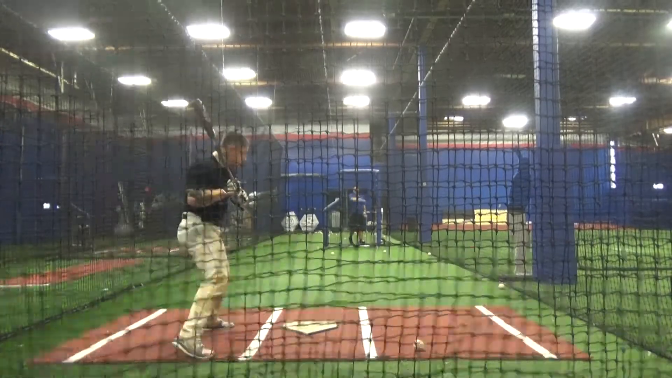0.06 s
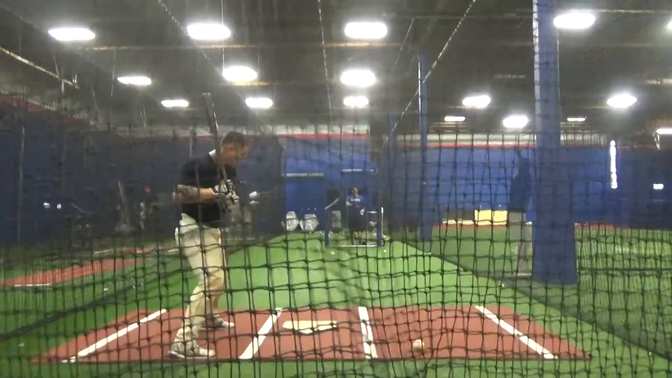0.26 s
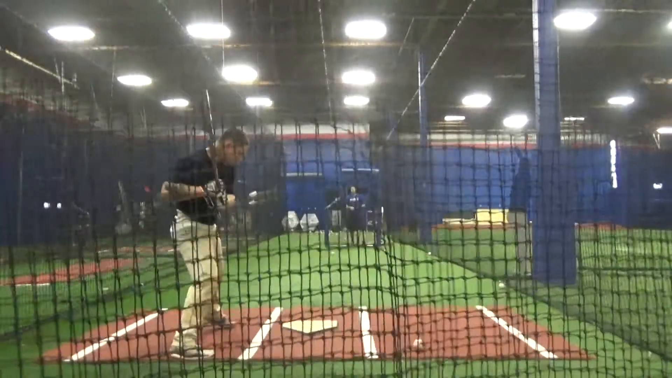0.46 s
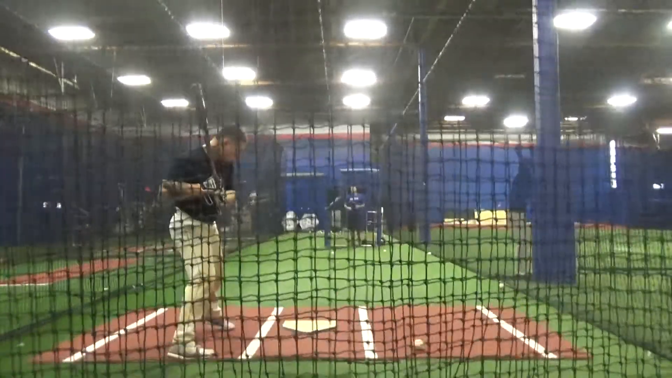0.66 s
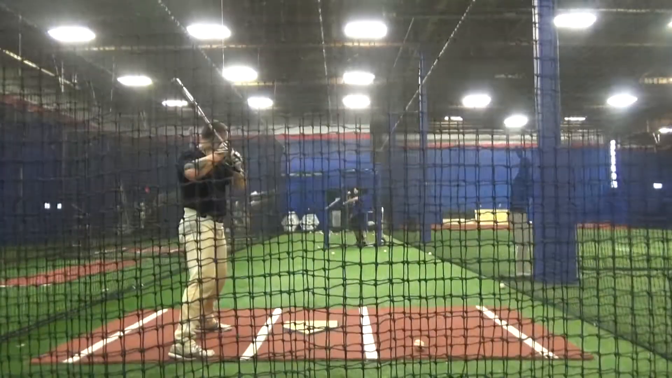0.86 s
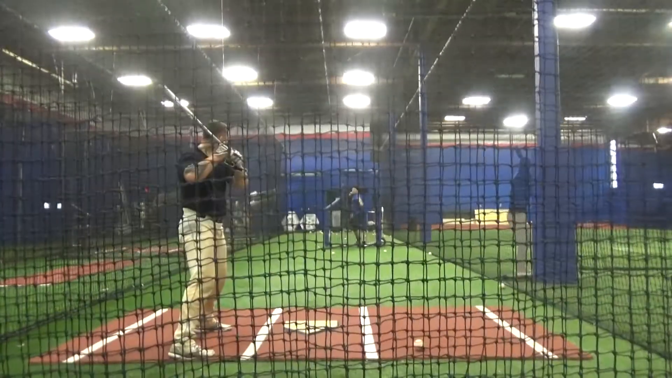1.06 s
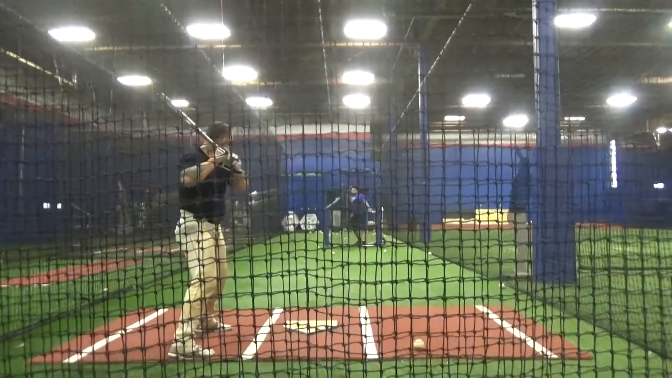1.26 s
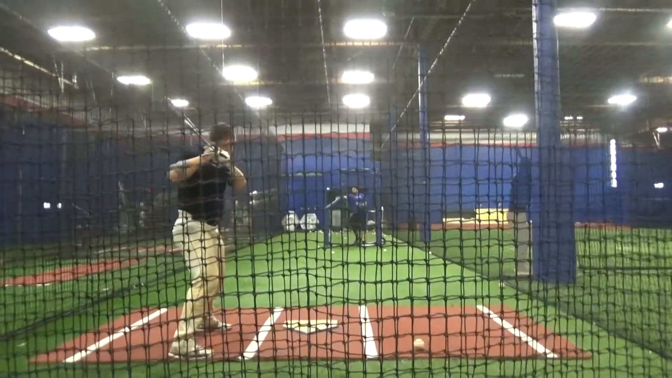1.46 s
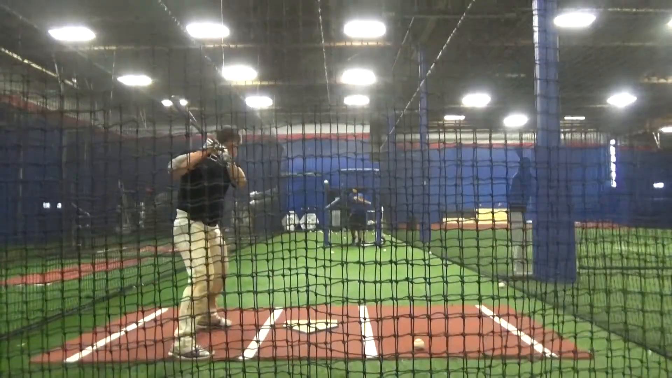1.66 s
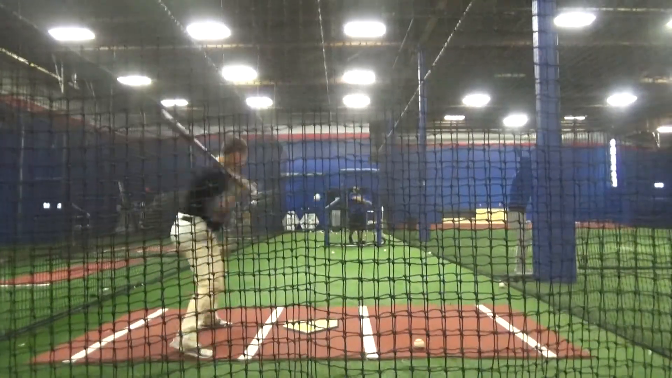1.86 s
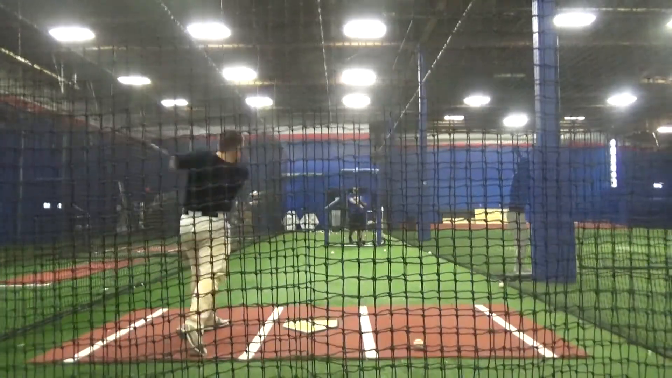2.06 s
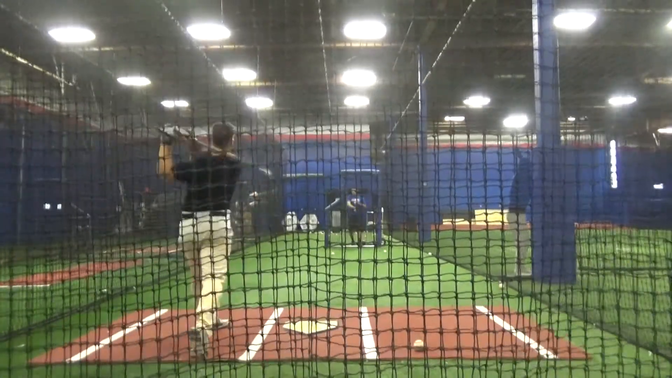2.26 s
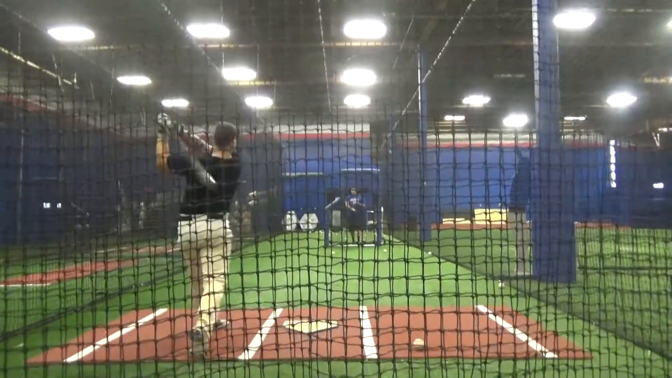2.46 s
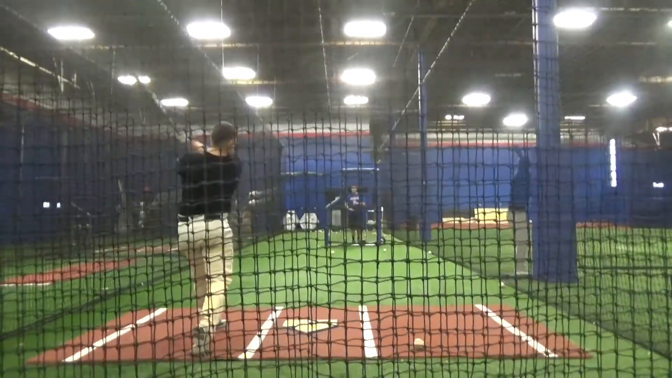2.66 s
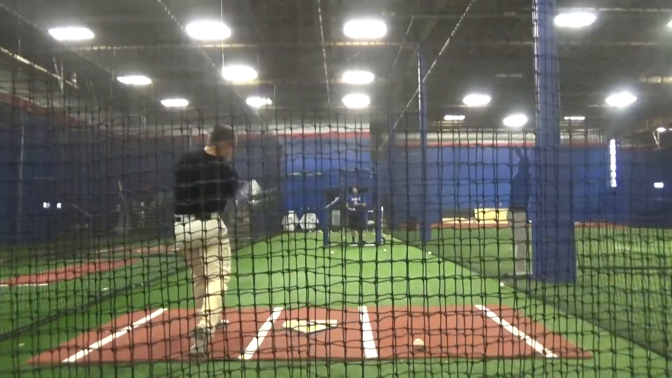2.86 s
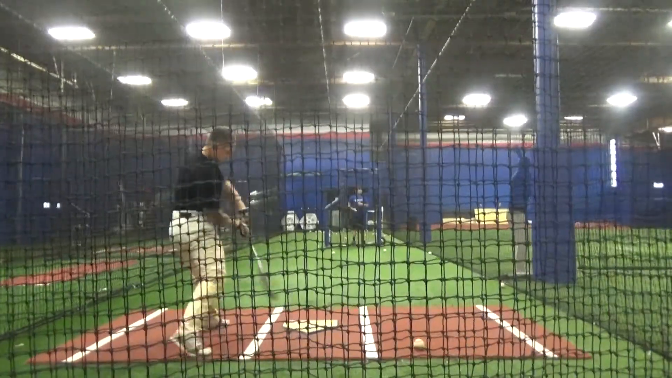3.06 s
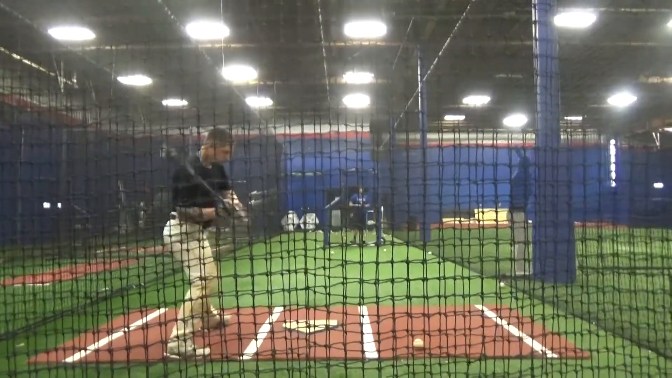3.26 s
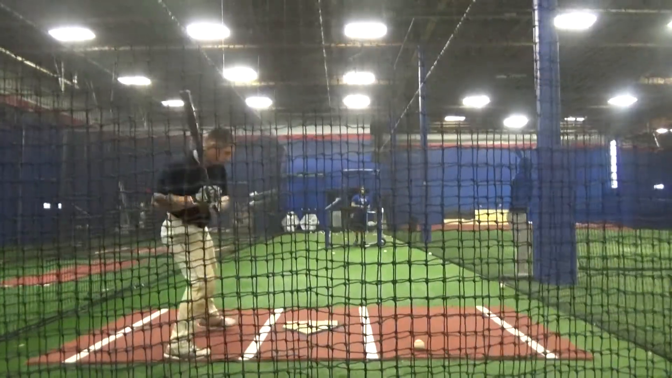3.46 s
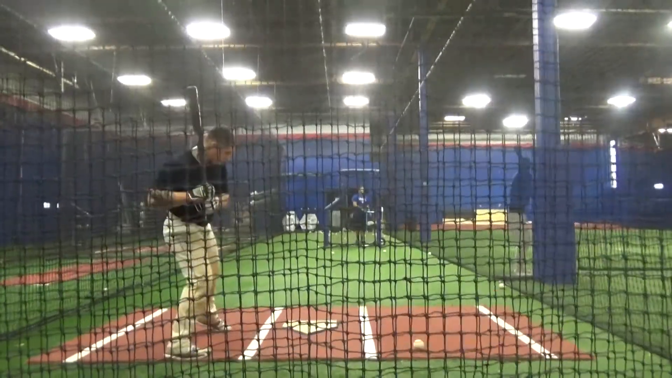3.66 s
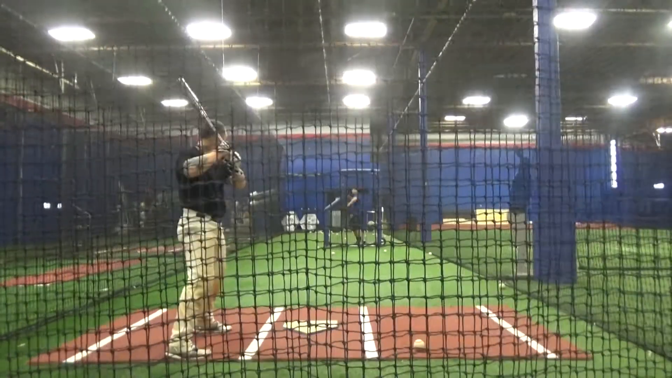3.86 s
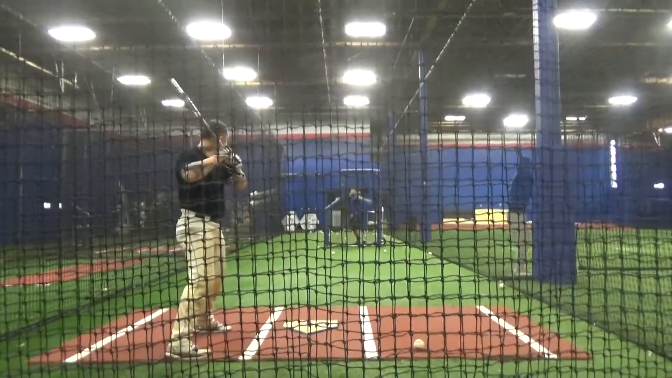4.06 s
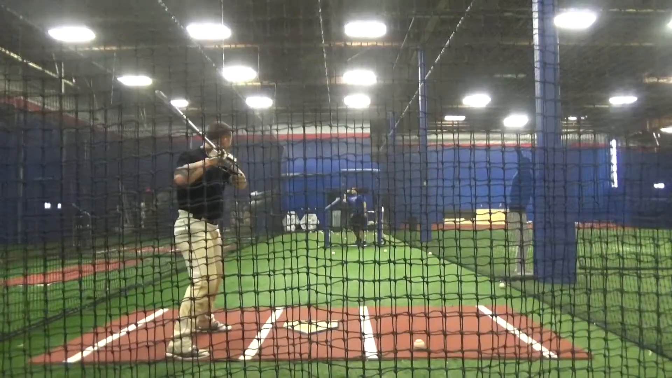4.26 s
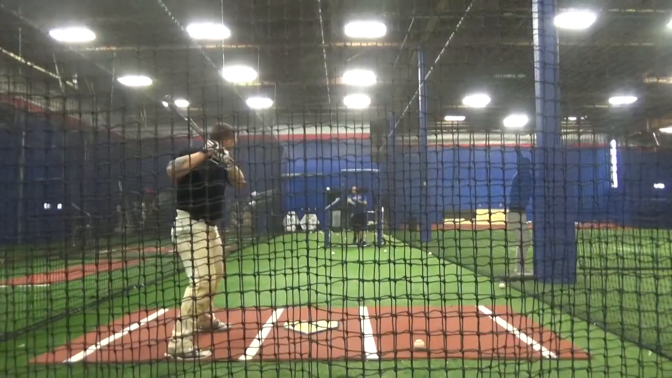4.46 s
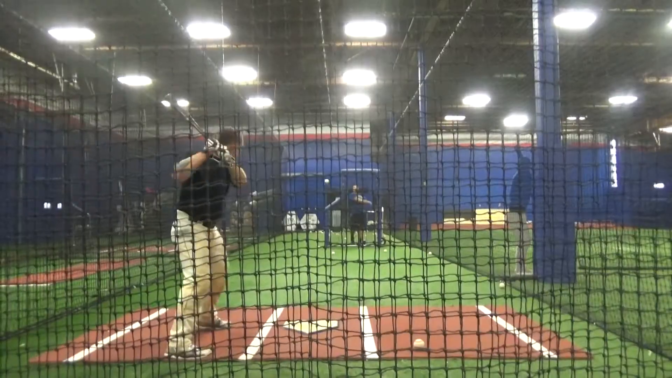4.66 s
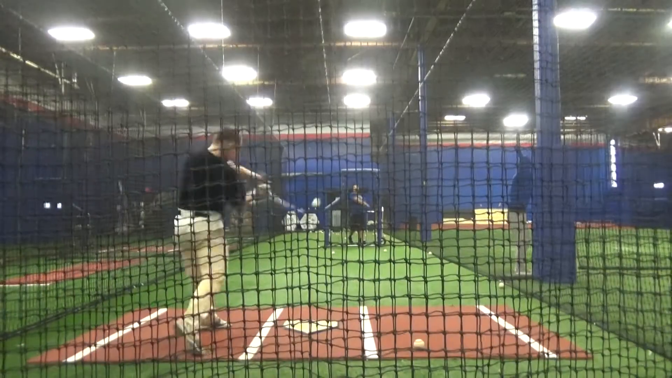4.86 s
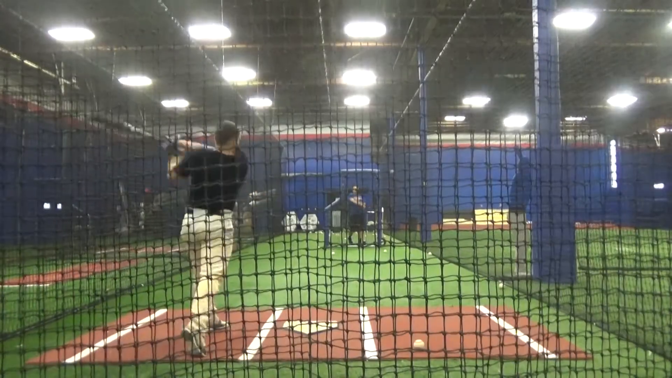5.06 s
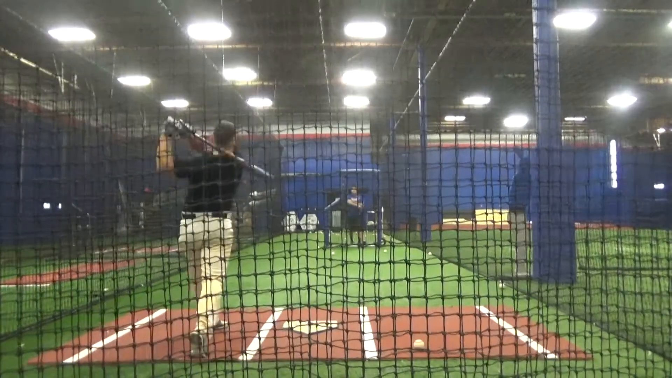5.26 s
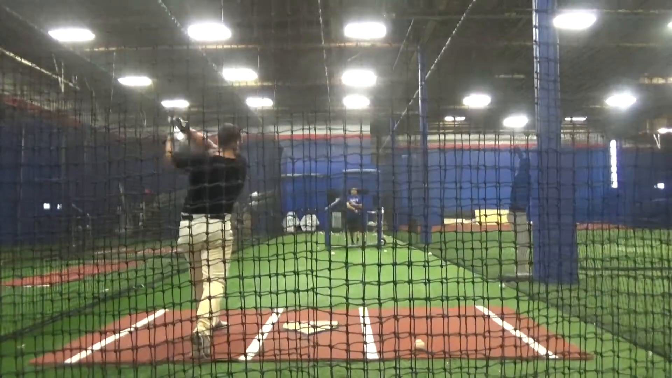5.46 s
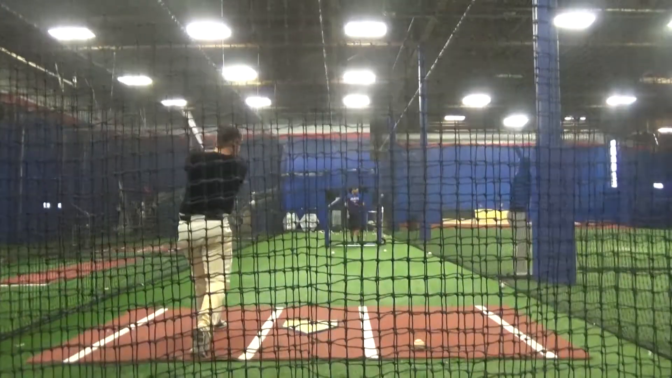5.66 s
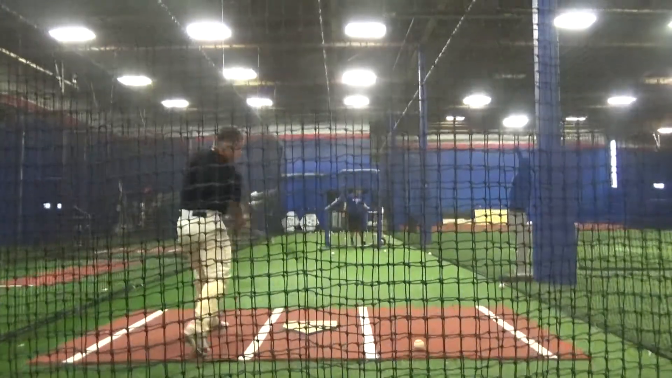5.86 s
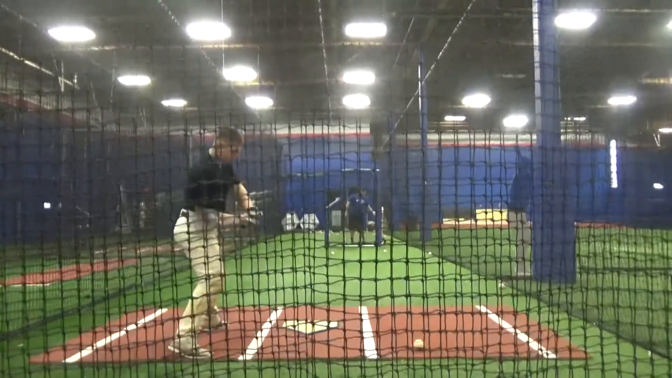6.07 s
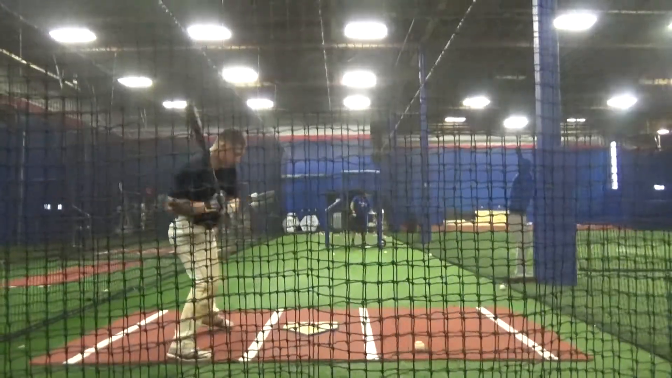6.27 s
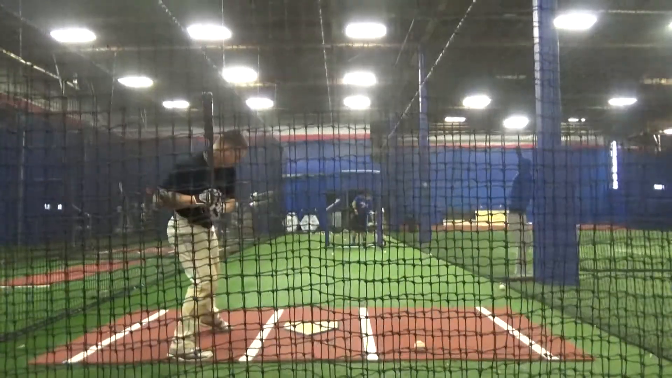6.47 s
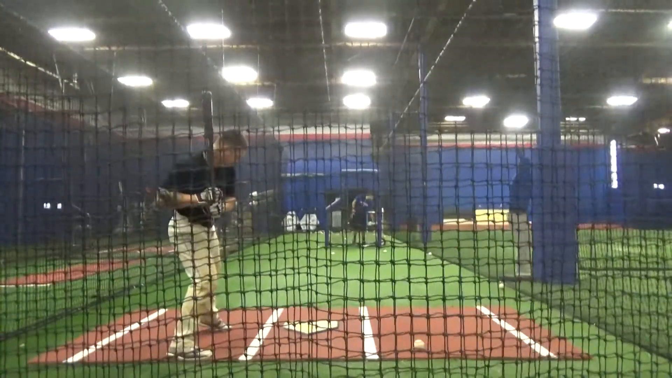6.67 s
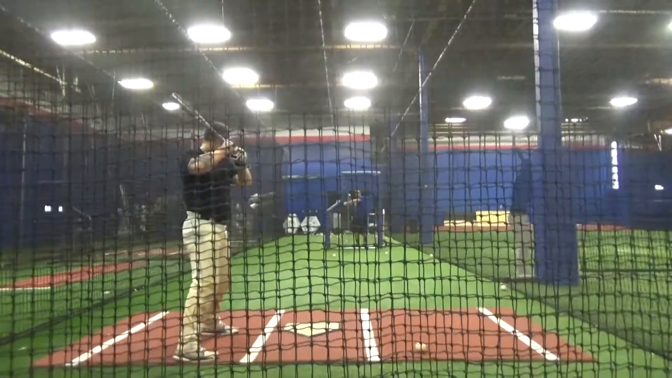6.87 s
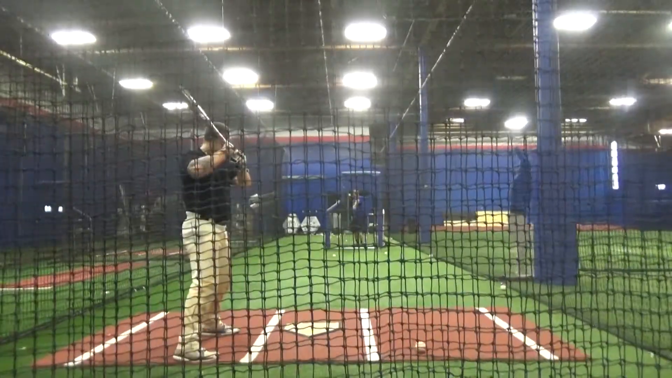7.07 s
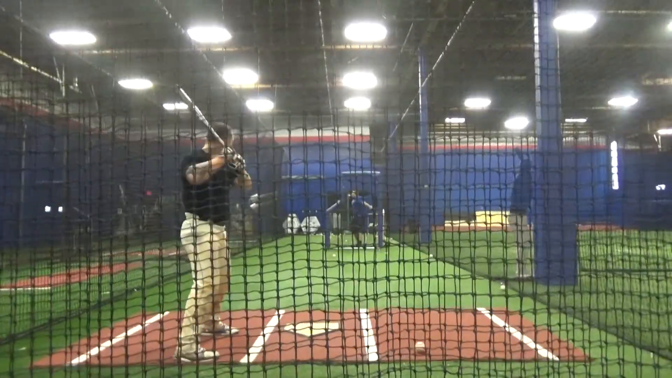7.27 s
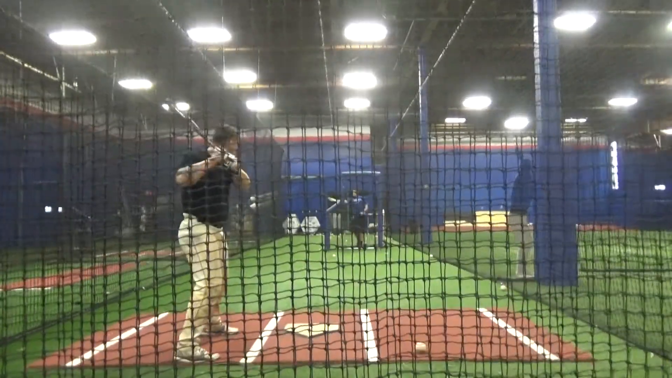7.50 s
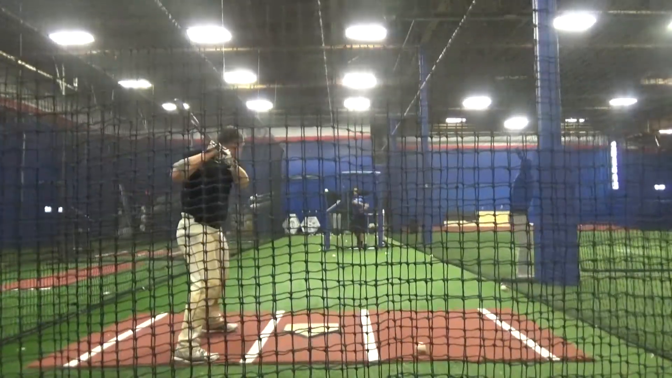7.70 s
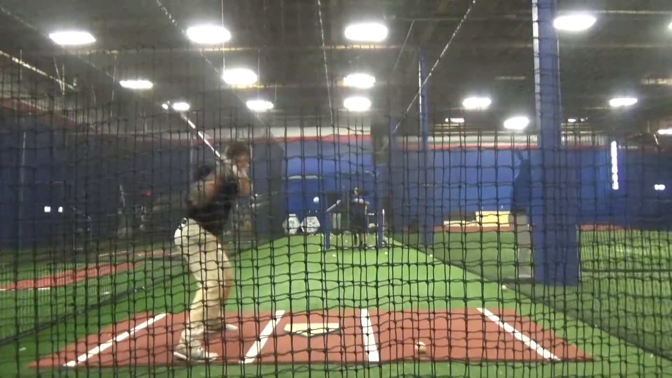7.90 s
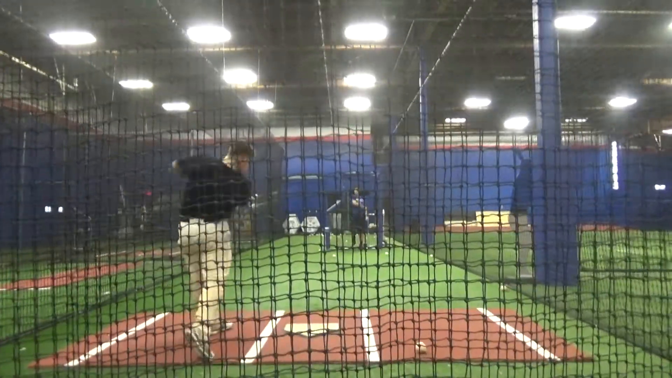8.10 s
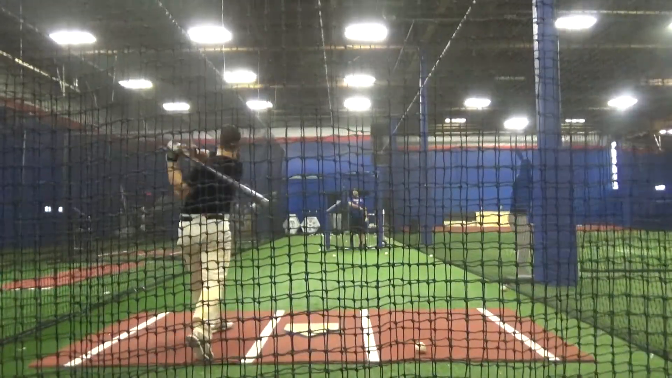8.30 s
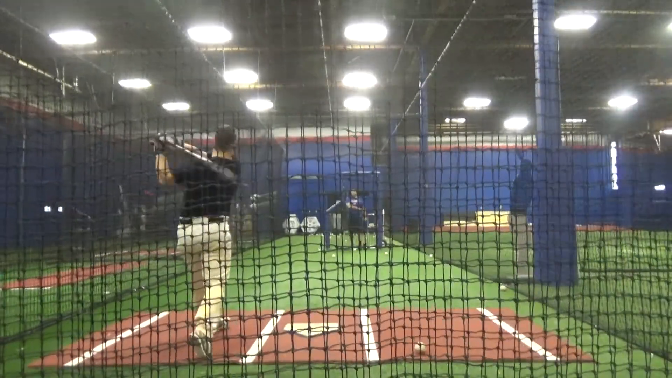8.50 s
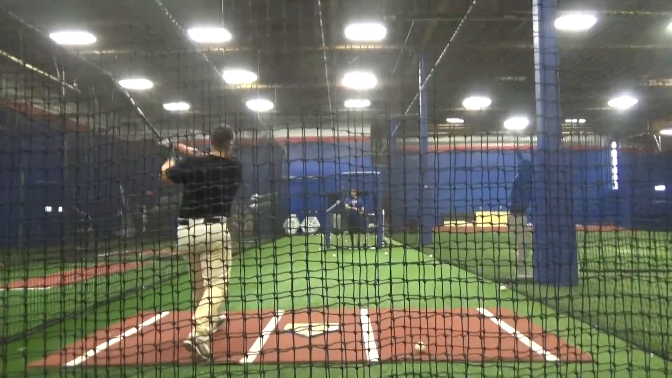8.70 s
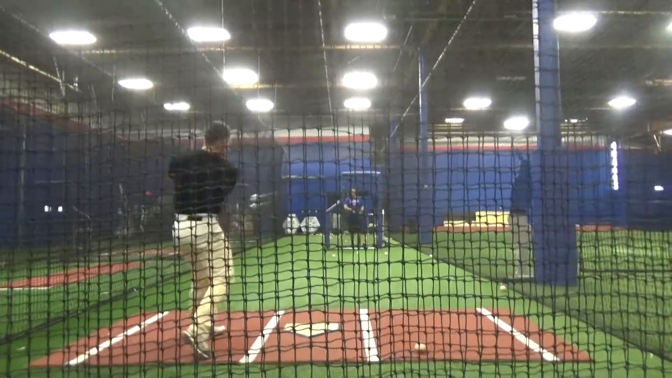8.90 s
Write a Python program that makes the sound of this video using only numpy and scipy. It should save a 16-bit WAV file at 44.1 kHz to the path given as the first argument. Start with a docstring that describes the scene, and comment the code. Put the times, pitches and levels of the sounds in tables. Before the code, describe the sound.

A large indoor batting cage with quiet ventilation. A hard clack nearby and light taps open the scene, then a quick swish and a loud sharp crack of bat on ball, with wall echoes and a long ring. The same swing repeats twice, about three seconds apart, with net rattle, cloth rustle and small taps between. After the last hit come a dull thud and thin metallic chinks. Stereo microphone close behind the net.

```python
"""Three swishes and cracks, each with a long hall ring, over ventilation: a batter drives three balls in an indoor cage.
Each crack is a causal pulse with barrel modes, near bounces, single wall echoes and a diffuse tail.
Caught balls rattle the netting and the last one chinks its fittings: grainy noise and fluttering sines.
A clack, taps, clicks and thuds are short sprays of contacts through resonant bodies; cloth, air,
ventilation and hiss are shaped noise. Three times the level dips briefly."""
import sys
import numpy as np
from scipy import signal
from scipy.fft import rfft, irfft, next_fast_len
from scipy.io import wavfile

SR = 44100
rng = np.random.default_rng(int(sys.argv[2]) if len(sys.argv) > 2 else 0)


def int16_out(signal):
    """Quantize to a 16-bit WAV file."""
    q = np.round(np.clip(np.atleast_2d(signal).T, -1, 1) * 32767)
    wavfile.write(sys.argv[1], SR, q.astype(np.int16))


N = 394254
SIZE = 4096  # samples on the frequency grid
HZ = np.fft.rfftfreq(SIZE, 1 / SR)
TIME_S = np.arange(N) / SR

# Likeness of the two microphones in a diffuse field. Each row: frequency in Hz, likeness 0 to 1.
LIKENESS = [(60, .99), (160, 1), (280, 1), (500, 0.98), (1000, 0.75), (2000, 0.71), (4000, 0.81),
            (8000, 0.88), (13000, 1)]
# Ventilation spectrum. Each row: frequency in Hz, relative level in dB.
VENT_SPECTRUM = [(15, -49), (25, -47), (76, -20.5), (102, -8.5), (134, -10), (185, -1), (217, -3),
                 (451, -9.5), (489, -4), (591, -8), (1160, -8), (2550, -11), (2990, -11), (6380, -17.5),
                 (16000, -32.5)]
VENT_DB = -63.6
OLD_RING_DB, OLD_RING_S = 4, 0.75  # an earlier hit's hall ring dies away: initial rise over the ventilation, duration
# Hiss spectrum. Each row: frequency in Hz, relative level in dB.
HISS_SPECTRUM = [(1500, -13.5), (3500, 1), (6000, 3), (8000, -3.5), (14000, -30)]
# Stretches with a faint hiss. Each row: start in seconds, end in seconds, level in dB.
HISS_STRETCHES = [(0, .763, -72), (6.777, 8.94, -66.8)]

# Cage reverberation. Each row: frequency in Hz, level in dB, t60 in seconds.
CAGE_BANDS = [(60, -27, .4), (250, -31, 1), (470, -19.5, 0.6), (770, -13.5, 0.63), (990, -18, 0.38),
              (2000, -22, 1), (4100, -28.5, 0.97), (8000, -17.5, 0.56), (15000, -8, 0.44)]
# Hall reverberation. Each row: frequency in Hz, level in dB, t60 in seconds.
HALL_BANDS = [(60, -28.5, 2.6), (250, -28, 2.54), (590, -27.5, 2.3), (755, -28, 2.24), (1030, -26, 2.2),
              (1400, -28.5, 2.74), (1650, -24.5, 2.74), (1900, -27.5, 2.96), (3240, -31.5, 2.405),
              (5270, -37.5, 2.1), (8500, -35.5, 1.2), (15000, -33.5, .7)]

# Small bodies radiate little bass, soft contacts little treble. Each row: frequency in Hz, gain in dB.
SMALL_BODY = [(20, -24), (70, -9.5), (160, -1.5), (9500, -3), (15500, -18)]
# Hard clack close by as the batter gets ready. One row: start in seconds, level in dB, centre in Hz,
# width in octaves, t60 in seconds, room in dB.
CLACK_BLOW = (.0398, 4.3, 4000, .72, .018, -25)
REBOUND_S, REBOUND_DB = 0.0033, -5.5  # after, and relative to, the first strike
SPRAY_S, SPRAY_DB, SPRAY_T60_S, SPRAY_HZ = 0.0176, -6.8, 0.15, 9500  # treble scattered by the cage
# Wall echoes of the clack: delays in seconds.
CLACK_ECHOES_S = (.0355, .083, .115, .156)
CLACK_ECHO_DB, CLACK_ECHO_FALL_DB = -15, 6.5  # first echo re the clack; fall per doubling of delay
CLOSE_LEAN_DB = 0.9  # clack, clicks and thuds: left up, right down

# Light taps on something hard near the batter. Each row: start in seconds, level in dB, tilt in dB per octave.
TAP_TIMES = [(.177, -21, -.5), (.390, -19.5, 2.5), (3.34, -27, -1), (3.558, -18.5, -0.3), (6.219, -19, 0),
             (6.369, -15.5, 0), (6.571, -17, 2)]
# Tapped body. Each row: frequency in Hz, relative level in dB.
TAP_SPECTRUM = [(50, -15), (220, -2), (450, -10), (1100, 0), (2500, -9.5), (5000, -11.5), (7500, -21),
                (15000, -25)]
# Narrow ringing of the tapped body. Each row: frequency in Hz, width in Hz, lift in dB.
TAP_RESONANCES = [(973, 93, 2.5), (1250, 67, 2.5), (2155, 82, 3.5), (3440, 500, 6), (5360, 950, 6.5)]
# Clicks of gear and net clips. Each row: start in seconds, level in dB, centre in Hz, t60 in seconds.
CLICK_BLOWS = [(.468, -23.5, 5000, .12), (.505, -15.5, 9000, .022), (.874, -33.5, 7500, .005),
               (3.197, -19, 2800, .4), (8.552, -13.5, 2600, .015)]
CLICK_OCTAVES, CLICK_ROOM_DB = 0.66, -27
# Thuds of shoes on turf and balls on padding. Each row: start in seconds, level in dB, centre in Hz,
# t60 in seconds, room in dB, bass in dB.
THUD_BLOWS = [(.51, -18, 560, .0067, -26, -32), (6.075, -32, 280, .3, -5, -2),
              (6.1, -21.3, 440, .14, -20, -26), (8.355, -9.3, 490, .27, -5, -13)]
THUD_OCTAVES, THUD_BASS_HZ = 0.29, 185

# Rubs of the clothes in every swing. Each: seconds from contact to peak, level in dB,
# rise in seconds, fall in seconds.
STRIDE_RUB = (-.18, -64, .085, .06)
SWING_RUB = (-.016, -52, .058, .036)
REGRIP_RUB = (1.43, -56, .05, .025)
# After the follow-through he lowers the bat and steps back.
RELAX_S, RELAX_HOLD_S, RELAX_EDGE_S, RELAX_DB = 0.86, 0.8, 0.06, -64.5
RELAX_RUBS_PER_S, RELAX_UNEVEN_DB = 14, 3
# Cloth spectrum. Each row: frequency in Hz, relative level in dB.
CLOTH_SPECTRUM = [(40, -25), (200, -2), (1500, 2.5), (4000, -0.5), (8000, -2.5), (11000, -6.5),
                  (15000, -37)]
# Air round the bat. Each row: frequency in Hz, relative level in dB.
SWISH_SPECTRUM = [(30, -38), (120, -19), (450, -11), (1000, -9.5), (2500, -14), (6000, -9), (14000, -23)]

# Bat on ball. Each row: contact in seconds, direct level in dB, room level in dB, tilt in dB per octave,
# lifts of the four barrel modes in dB.
BAT_HITS = [(1.9747, 8.7, -0.7, -0.62, 6.8, 8.8, 2.5, 2.3), (4.9187, 8.7, -1.26, -0.2, 9.3, 3.8, 5, 4.2),
            (8.0666, 7.4, -0.39, -0.33, 5.6, 5.5, 4, 3)]
# Main modes of the bat. Each row: frequency in Hz, width in Hz.
BARREL_MODES = [(975, 210), (1120, 106), (1520, 350), (1750, 74)]
# Higher modes of the bat. Each row: frequency in Hz, width in Hz, lift in dB.
BAT_OVERTONES = [(2880, 950, 5), (4620, 380, 2.5), (5500, 910, 3.5), (9600, 1500, 1.5)]
# Ball on bat. Each row: frequency in Hz, relative level in dB.
CONTACT_SPECTRUM = [(40, -47), (120, -35), (280, -20.5), (480, -11), (850, -5.5), (1350, -2.5), (2100, -3),
                    (3300, -2), (4100, -2), (6500, -8.5), (10000, -22.5), (15500, -50)]
# Radiation backward to the listener. Each row: frequency in Hz, relative gain in dB.
BACKWARD_GAIN = [(100, 10.5), (450, -8), (750, -7.5), (1100, 1.5), (2800, 3), (6000, -5), (14000, 19)]
# Bounces off batter and ground. Each row: delay in seconds, level in dB.
NEAR_BOUNCES = [(.00113, -1.5), (.0017, -10.5), (.0032, -10.5), (.0056, -23)]
# Single echoes of walls and roof. Each row: delay in seconds, relative level in dB.
WALL_ECHOES = [(.0229, 0), (.0585, 3), (.096, -.5), (.1442, 8.8), (.1716, 5), (.199, 1), (.549, -6)]

# Balls landing in the netting, and its shaking after the hardest catch. Each row: start in seconds,
# level in dB, t60 of the rattle in seconds, tilt in dB per octave.
NET_CATCHES = [(2.449, -37.5, 0.75, 6.3), (5.24, -34.5, 0.72, 5), (8.354, -24.5, 0.19, 21.5),
               (8.42, -36, 0.36, 17), (8.545, -52, 1.2, 19.5)]
# Net rattle. Each row: frequency in Hz, relative level in dB.
RATTLE_SPECTRUM = [(60, -34), (500, -11), (2000, 13), (5000, 20), (9000, 3), (12000, -8), (15500, -24)]
# The fittings swing together. Each row: start in seconds, level in dB.
FITTING_CHINKS = [(8.505, -50), (8.758, -62)]
# Modes of the metal fittings. Each row: nominal frequency in Hz, relative level in dB, t60 in seconds.
FITTING_MODES = [(9000, -12, 0.8), (11170, 2, 0.41), (11250, -9, 0.8), (12180, -11, 0.7), (12900, -11, 0.7)]

# Brief dips of the level. Each row: centre in seconds, half length in seconds.
LEVEL_DIPS = [(0.763, 0.035), (3.768, 0.037), (6.777, 0.039)]
EDGE_HZ = 15900  # upper band edge


def amp(db):
    """Decibels to gain."""
    return 10 ** (np.asarray(db) / 20)


def read(points, hz, axis=1):
    """One column of a table over log frequency."""
    columns = np.transpose(points)
    return np.interp(np.log(hz + 1), np.log(columns[0] + 1), columns[axis])


def unit(x):
    """Scales to a mean energy of 1 a channel."""
    return x / np.sqrt(np.mean(np.sum(x ** 2, -1)) + 1e-20)


def add(mix, s, sound):
    """Mixes a sound in at time s."""
    part = mix[:, max(round(s * SR), 0):][:, :sound.shape[-1]]
    part += sound[..., :part.shape[1]]


def convolve(a, b):
    """Convolution along time, channel by channel."""
    return signal.fftconvolve(np.atleast_2d(a), np.atleast_2d(b), axes=1)


def octaves(hz, centre_hz=3000):
    """Distance from a centre in octaves."""
    return np.log2((hz + 20) / centre_hz)


def resonances(modes):
    """Lift in dB over frequency from rows of (Hz, width Hz, dB)."""
    return sum(db / (1 + (2 * (HZ - hz) / width_hz) ** 2) for hz, width_hz, db in modes)


def hump(hz, width):
    """Spectrum in dB of one broad resonance, width in octaves, steeper on its low side."""
    away = octaves(HZ, hz)
    low_side_db = 10 * np.minimum(away + 1.74 * width, 0)
    return -32 * np.log10(1 + (away / width) ** 2 / 4) + low_side_db


def causal(db):
    """The most compact pulse with this spectrum (minimum phase): sharp front, ringing back."""
    log_gain = np.log(amp(np.maximum(db, db.max() - 90)))
    circle = np.concatenate([log_gain, log_gain[-2:0:-1]])
    return np.fft.ifft(np.exp(np.conj(signal.hilbert(circle)))).real[:SIZE // 2]


def pair(a, b):
    """Two unrelated signals become a diffuse field at two close microphones."""
    same = np.clip(read(LIKENESS, np.fft.rfftfreq(len(a), 1 / SR)), 0, 1)
    mid = rfft(a) * np.sqrt((1 + same) / 2)
    side = rfft(b) * np.sqrt((1 - same) / 2)
    return irfft(np.array([mid + side, mid - side]), len(a))


def noise(spectrum, count, tilt_db=0, shape=1):
    """Diffuse coloured noise of rms 1; shape makes it grainy."""
    size = next_fast_len(count, True)
    hz = np.fft.rfftfreq(size, 1 / SR)
    white = pair(*rng.standard_normal((2, size)))[:, :count] * shape
    gain = amp(read(spectrum, hz) + tilt_db * octaves(hz))
    x = irfft(rfft(white, size) * gain, size)
    return unit(x[:, :count]) * np.sqrt(count)


def flutter(count, per_s, depth_db):
    """A random gain of rms 1 that changes per_s times a second."""
    place = np.arange(count) * per_s / SR
    knots = np.random.default_rng(rng.integers(2 ** 31)).standard_normal(int(place[-1]) + 2)
    gain = np.interp(place, np.arange(len(knots)), amp(depth_db * knots))
    return unit(gain) * np.sqrt(count)


def background():
    """An earlier hit's hall ring dies away over steady ventilation; faint hiss in two stretches: coloured noise."""
    level_db = VENT_DB + OLD_RING_DB * np.maximum(1 - TIME_S / OLD_RING_S, 0)
    vent_and_ring = noise(VENT_SPECTRUM, N) * amp(level_db) * flutter(N, 36, 0.6)
    hiss_gain = sum(amp(db) * ((TIME_S >= start) & (TIME_S < end)) for start, end, db in HISS_STRETCHES)
    return vent_and_ring + hiss_gain * noise(HISS_SPECTRUM, N)


def tail(bands, start, rise, grain_db):
    """Dense reflections of uneven strength that build up, each band dying at its own speed."""
    count = 2 * SR
    build_up = 1 - np.exp(-np.maximum(TIME_S[:count] - start, 0) / rise)
    reflections = rng.standard_normal((2, count)) * flutter(count, 900, grain_db) * build_up
    hz, t, z = signal.stft(reflections, SR, nperseg=512)
    decay_db = 60 * t / read(bands, hz, axis=2)[:, None]
    z = z * amp(read(bands, hz)[:, None] - decay_db)
    return pair(*signal.istft(z, SR, nperseg=512)[1][:, :count])


def room():
    """The nearest walls answer after a gap; the hall swells behind them."""
    cage = tail(CAGE_BANDS, start=0.019, rise=0.0062, grain_db=3.5)
    return cage + tail(HALL_BANDS, start=0.025, rise=0.013, grain_db=0.5)


def scatter(t60, grain_db=3):
    """The short spray of reflections from a rough surface, energy 1."""
    t = TIME_S[:SIZE * 2]
    envelope = flutter(len(t), 2000, grain_db) * amp(-60 * t / t60)
    return unit(pair(*rng.standard_normal((2, len(t))) * envelope))


def blow(spectrum_db, t60, hall, room_db):
    """A short spray of contacts rings a body, and the hall answers."""
    body = unit(causal(spectrum_db + read(SMALL_BODY, HZ)))
    contact = scatter(t60)
    add(contact, 0, 0.62 * np.ones(1))  # first touch
    out = amp(room_db) * convolve(body, hall[:, :SR])
    add(out, 0, unit(convolve(body, contact)))
    return out


def clack(hall):
    """Two hard things strike and rebound; the cage answers with a bright spray and a few single echoes."""
    out = np.zeros((2, N))
    s, db, hz, width, t60, room_db = CLACK_BLOW
    body = amp(db) * unit(causal(hump(hz, width) + read(SMALL_BODY, HZ)))
    add(out, s, amp(db) * blow(hump(hz, width), t60, hall, room_db))
    add(out, s + REBOUND_S, amp(REBOUND_DB) * body)
    bright = causal(hump(SPRAY_HZ, width=1.0) + read(SMALL_BODY, HZ))
    spray = unit(convolve(bright, scatter(SPRAY_T60_S, grain_db=6)))
    add(out, s + SPRAY_S, amp(SPRAY_DB) * spray)
    for delay in CLACK_ECHOES_S:
        echo_db = CLACK_ECHO_DB - CLACK_ECHO_FALL_DB * np.log2(delay / CLACK_ECHOES_S[0])
        add(out, s + delay, amp(echo_db) * convolve(body, scatter(t60=0.009)))
    return out


def taps(hall):
    """Light contacts on a hard body that rings in a few narrow modes."""
    out = np.zeros((2, N))
    for s, db, tilt_db in TAP_TIMES:
        body_db = read(TAP_SPECTRUM, HZ) + resonances(TAP_RESONANCES) + tilt_db * octaves(HZ)
        add(out, s, amp(db) * blow(body_db, t60=0.024, hall=hall, room_db=-24))
    return out


def clicks(hall):
    """Small contacts, each through one broad resonance."""
    out = np.zeros((2, N))
    for s, db, hz, t60 in CLICK_BLOWS:
        add(out, s, amp(db) * blow(hump(hz, CLICK_OCTAVES), t60, hall, CLICK_ROOM_DB))
    return out


def thuds(hall):
    """Dull blows with one broad low resonance, each also pushing a little bass."""
    out = np.zeros((2, N))
    bass = amp(hump(THUD_BASS_HZ, width=0.7))
    for s, db, hz, t60, room_db, bass_db in THUD_BLOWS:
        body_db = 20 * np.log10(amp(hump(hz, THUD_OCTAVES)) + amp(bass_db) * bass)
        add(out, s, amp(db) * blow(body_db, t60, hall, room_db))
    return out


def swell(s, db, rise, fall, hold=0):
    """Level of a movement that peaks at time s, holds and dies away."""
    away = np.maximum((s - TIME_S) / rise, (TIME_S - s - hold) / fall)
    return amp(db) * np.exp(-np.clip(away, 0, 20))


def batter():
    """Cloth rubs in the same order round each hit; air rushes round the bat up to the contact."""
    rub, air = np.zeros(N), np.zeros(N)
    uneven = flutter(N, RELAX_RUBS_PER_S, RELAX_UNEVEN_DB)
    for s, *_ in BAT_HITS:
        rub += sum(swell(s + lag, *shape) for lag, *shape in (STRIDE_RUB, SWING_RUB, REGRIP_RUB))
        rub += uneven * swell(s + RELAX_S, RELAX_DB, RELAX_EDGE_S, RELAX_EDGE_S, RELAX_HOLD_S)
        air += swell(s, db=-43.5, rise=0.012, fall=0.02)
    cloth = rub * noise(CLOTH_SPECTRUM, N, shape=flutter(N, 120, 2.1))
    return cloth + air * noise(SWISH_SPECTRUM, N)


def bat(direct_db, room_db, tilt_db, *lifts_db):
    """One crack: the place of contact sets how much each barrel mode rings."""
    barrel = [(*mode, lift) for mode, lift in zip(BARREL_MODES, lifts_db)]
    db = read(CONTACT_SPECTRUM, HZ) + tilt_db * octaves(HZ) + resonances(barrel + BAT_OVERTONES)
    near = amp(-15) * scatter(t60=0.014) + amp(-2.5) * scatter(t60=0.1)  # turf and netting
    add(near, 0, np.ones(1))  # direct path
    for delay, bounce_db in NEAR_BOUNCES:
        add(near, delay, amp(bounce_db) * np.ones(1))
    far = amp(9) * room()
    wall_db = -1.5 - 2.3 * abs(octaves(HZ, centre_hz=4440))  # small hard faces mirror the upper middle best
    for delay, echo_db in WALL_ECHOES:
        air_db = -14 * delay * (HZ / 8000) ** 2  # long paths lose their treble
        add(far, delay, amp(echo_db) * convolve(scatter(t60=0.0089), causal(wall_db + air_db)))
    out = amp(room_db) * convolve(unit(causal(db)), far)
    direct = unit(convolve(causal(db + read(BACKWARD_GAIN, HZ)), near))
    add(out, 0, -amp(direct_db) * direct)
    return out


def netting():
    """The caught ball shakes the net; after the hardest catch its fittings chink thinly."""
    out, t = np.zeros((2, N)), TIME_S[:SR]
    attack = 1 - np.exp(-t / 0.0019)
    for s, db, t60, tilt_db in NET_CATCHES:
        rattle = noise(RATTLE_SPECTRUM, SR, tilt_db, shape=flutter(SR, 294, 2.4))
        add(out, s, amp(db - 60 * t / t60) * attack * rattle)
    for s, db in FITTING_CHINKS:
        for hz, mode_db, t60 in FITTING_MODES:
            detuned_hz = hz + rng.normal(0, 11)
            ring = np.sin(2 * np.pi * detuned_hz * t) * flutter(SR, 45, 4.5)
            add(out, s, amp(db + mode_db - 60 * t / t60) * attack * ring)
    return out


def scene():
    """All sources at the two microphones."""
    close_hall = room()
    add(close_hall, 0, amp(4) * scatter(t60=0.25))  # sounds near the net are scattered at once
    close = clack(close_hall) + clicks(close_hall) + thuds(close_hall)
    close = close * amp([[CLOSE_LEAN_DB], [-CLOSE_LEAN_DB]])
    mix = background() + close + taps(close_hall) + batter() + netting()
    for s, *stroke in BAT_HITS:
        end = min([dip for dip, _ in LEVEL_DIPS if dip > s] + [N / SR])  # the echo breaks off at the next dip
        add(mix, s, bat(*stroke)[:, :round((end - s) * SR)])
    return mix


def record(dry):
    """The loudest peaks are rounded off, the level dips briefly three times, and the band ends."""
    ceiling = 0.99
    out = ceiling * np.tanh(dry / ceiling)
    for s, half_s in LEVEL_DIPS:
        out = out * np.sin(np.pi / 2 * np.minimum(abs(TIME_S - s) / half_s, 1)) ** 3
    lowpass = signal.firwin(255, EDGE_HZ, window=("kaiser", 8), fs=SR)
    return signal.oaconvolve(out, lowpass[None], "same")


dry = scene()
out = record(dry)
int16_out(out)
```